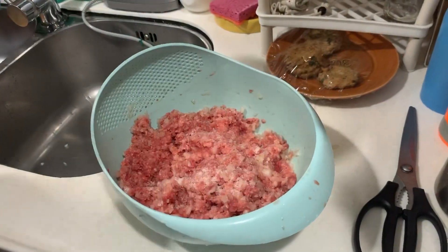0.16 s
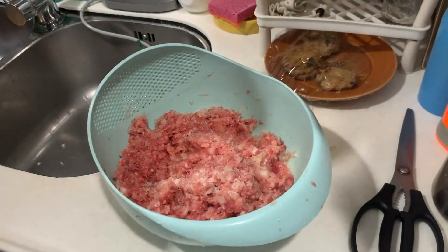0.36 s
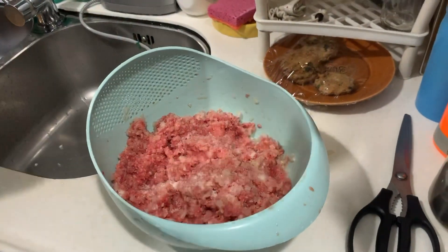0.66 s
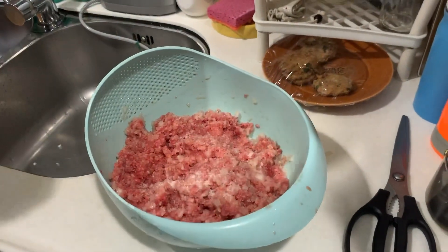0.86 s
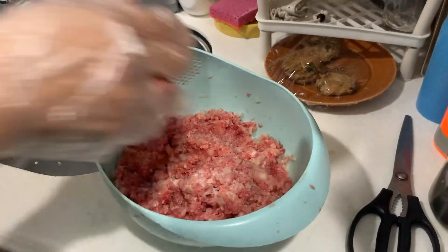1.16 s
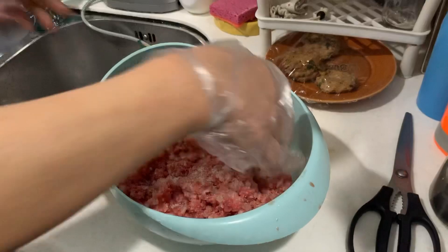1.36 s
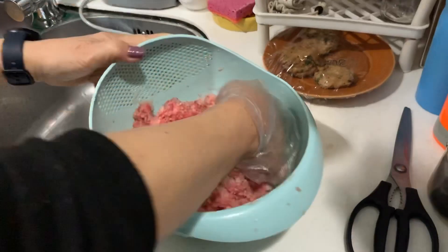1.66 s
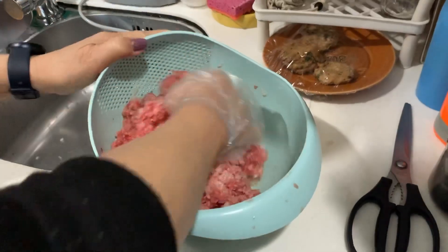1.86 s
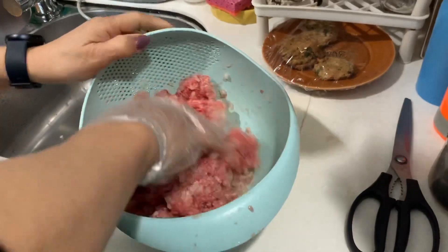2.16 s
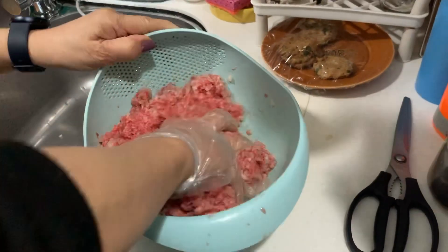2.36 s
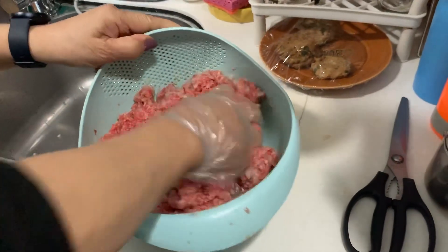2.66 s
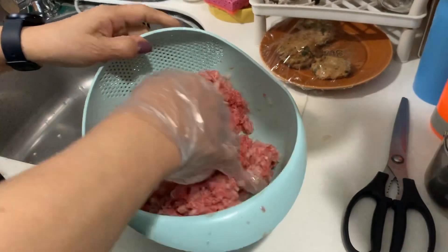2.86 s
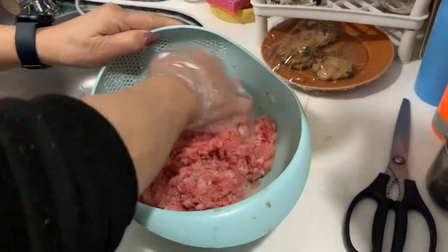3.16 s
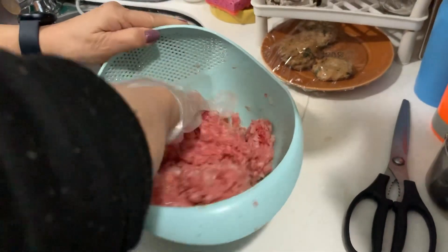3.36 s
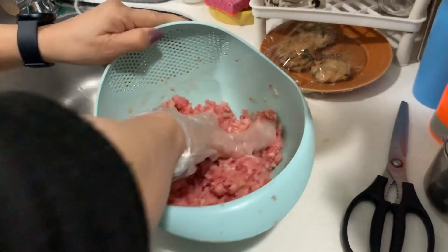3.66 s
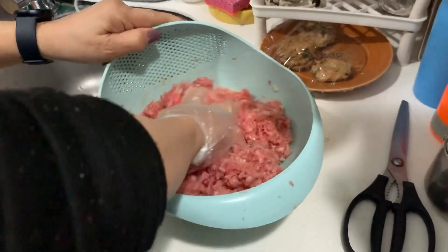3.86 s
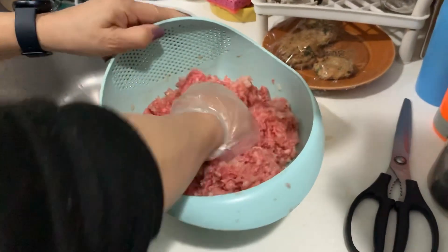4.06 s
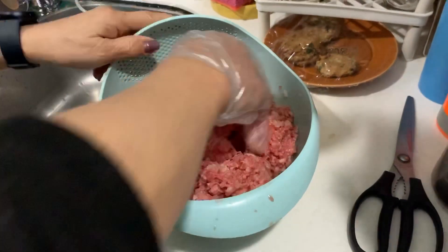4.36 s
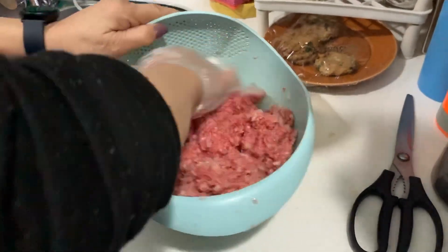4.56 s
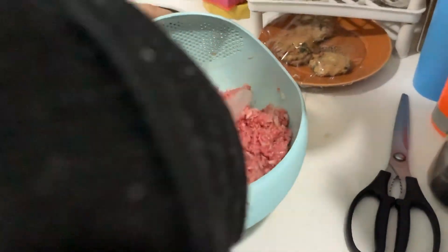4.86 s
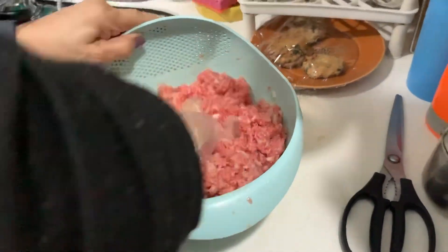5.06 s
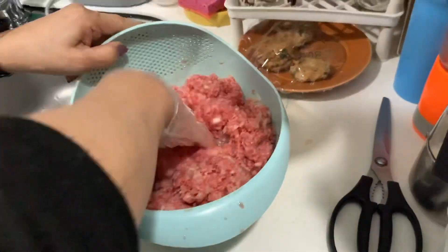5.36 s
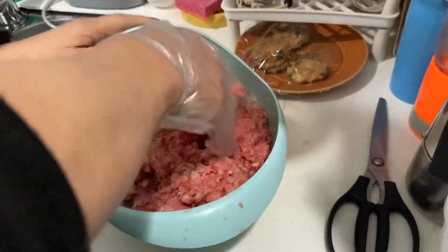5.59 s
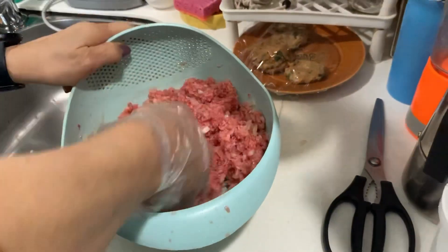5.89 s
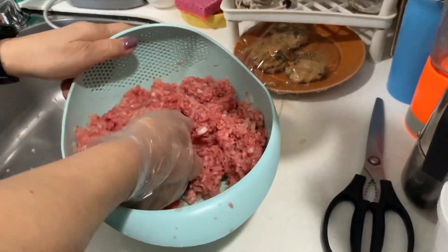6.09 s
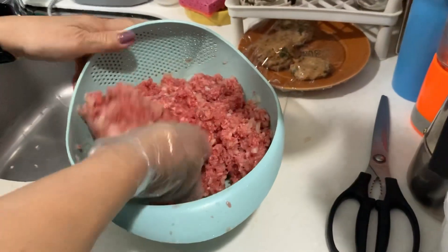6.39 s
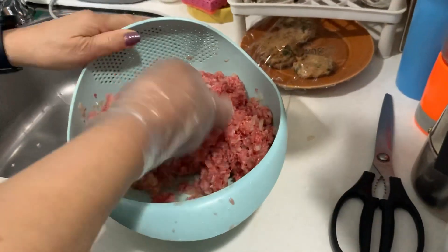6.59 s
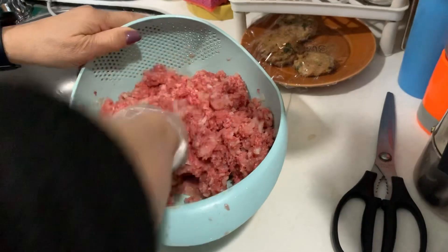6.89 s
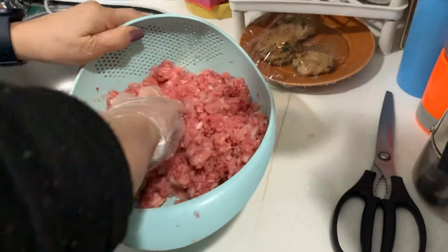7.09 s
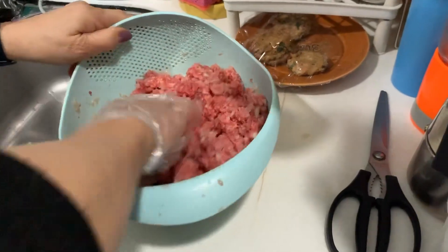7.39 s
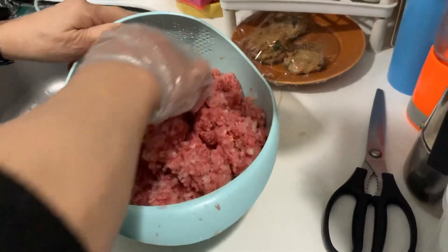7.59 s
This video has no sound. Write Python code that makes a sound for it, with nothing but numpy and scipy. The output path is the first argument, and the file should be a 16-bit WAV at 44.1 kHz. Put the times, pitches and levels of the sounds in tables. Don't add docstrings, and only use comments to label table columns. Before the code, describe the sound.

Close up in a small kitchen, a few hollow, rattling knocks come first over a steady low fridge hum. Thin plastic film begins to crackle as a gloved hand moves in, then it sinks into raw mince. Repeated kneading strokes bring bright crumpling, sticky squelches and little wet pops, while the plastic bowl rubs and bumps lightly on the counter. A phone nearby catches it all in stereo.

```python
import sys
import numpy as np
from scipy import signal
from scipy.fft import rfft, irfft, next_fast_len
from scipy.io import wavfile
from scipy.ndimage import uniform_filter1d, map_coordinates

SR = 44100
rng = np.random.default_rng(int(sys.argv[2]) if len(sys.argv) > 2 else 0)


def transcribe(signal):
    frames = np.atleast_2d(signal).T
    limited = np.clip(frames, -1, 1)
    pcm = np.round(limited * 32767).astype(np.int16)
    wavfile.write(sys.argv[1], SR, pcm)


def linear_from_db(decibels):
    return 10 ** (np.asarray(decibels, float) / 20)


N = 341334
REACH_S, TOUCH_S = 0.87, 1.33
FRAME = 2048

# frequency in Hz, level in dB.
FILM_COLOUR = [(1500, -16), (3000, -11.5), (5200, -9.5), (7000, -4.5), (8500, 0.5), (12000, -1),
               (15500, -1.5), (17000, -3)]
# peak in seconds, build in seconds per 10 dB,
# ease in seconds per 10 dB, film level in dB, mince level in dB.
SQUEEZES = [(1.369, 0.0169, 0.3, -37, -39), (1.538, 0.01, 0.14, -40.5, -44.5),
            (2.1, 0.035, 0.14, -35.5, -43), (2.28, 0.145, 0.29, -34, -40.5), (2.482, 0.22, 0.1, -40.5, -37),
            (2.649, 0.08, 0.13, -33.5, -40.5), (2.97, 0.0955, .25, -35, -38),
            (3.09, 0.06, 0.14, -43, -45.5), (3.25, -1, 1, -47.5, -51.5), (3.76, 0.24, .2, -34.5, -42),
            (3.911, 0.22, 0.07, -38, -38.5), (4.079, 0.07, 0.14, -32, -37.5), (4.47, 0.16, 0.2, -38, -42),
            (4.94, 0.2, 0.3, -38.5, -40), (5.07, 0.2, .08, -38, -40), (5.28, 0.1, .04, -32.5, -35),
            (5.601, 0.12, 0.24, -38.5, -43), (5.87, 0.11, 0.04, -38.5, -45.5),
            (6.21, 0.13, 0.07, -39, -46.5), (6.78, 0.13, 0.02, -35, -51), (6.998, 0.13, 0.14, -35, -41),
            (7.342, 0.14, .22, -36, -44), (7.7, 0.2, 2, -39, -45.5), (5.38, 0.4, 0.17, -41, -50)]


def unit(x):
    return x / np.sqrt(np.mean(x ** 2) + 1e-20)


def along(points, hz):
    f, v = np.transpose(points)
    return np.interp(np.log(hz + 1), np.log(f + 1), v)


def wobble(rate):
    knots = rng.standard_normal(int(N * rate / SR) + 4)
    return map_coordinates(knots, [np.arange(N) * rate / SR])


def filtered(x, response):
    m = next_fast_len(N + SR // 2)
    return irfft(rfft(x, m) * response(np.fft.rfftfreq(m, 1 / SR)), m)[..., :N]


def coloured(x, spectrum):
    return unit(filtered(x, lambda hz: linear_from_db(along(spectrum, hz))))


def resonant(x, modes):
    def response(f):
        total = 0
        for k, (centre, width, db) in enumerate(modes):
            damping = 1j * f * width
            total = total + (-1) ** k * linear_from_db(db) * damping / (centre * centre - f * f + damping)
        return total
    return unit(filtered(x, response))


def hiss(patchy_db=0, span=3):
    z = signal.stft(rng.standard_normal((2, N)), nperseg=256)[2]
    patches = uniform_filter1d(rng.standard_normal(z.shape[1:]), size=6, axis=0)
    patches = uniform_filter1d(patches, size=span, axis=1)
    return signal.istft(z * linear_from_db(patchy_db * unit(patches)), nperseg=256)[1][:, :N]


def crackle(share, spread_db, life, clump_db):
    sizes = linear_from_db(spread_db * np.minimum(rng.exponential(size=N), 4))
    starts = (rng.random(N) < share) * sizes
    grains = signal.lfilter([1], [1, -np.exp(-1 / (life * SR))], starts)
    return unit((2.9 + unit(grains)) * linear_from_db(clump_db * (wobble(14) + wobble(45))))


def bursts(times, peaks_db, t60s, rise):
    out, t = np.zeros(N + SR), np.arange(SR // 3) / SR
    for s, db, t60 in zip(times, peaks_db, np.broadcast_to(t60s, len(times))):
        out[round(s * SR):][:len(t)] += linear_from_db(db - 60 * t / t60) * (1 - np.exp(-t / rise))
    return out[:N]


def blips(rows, t60, ratios, rise=0.0004):
    out, t = np.zeros((2, N + SR)), np.arange(SR // 12) / SR
    phases = rng.random((len(rows), len(ratios), 2, 1))
    for (s, db, hz), phase in zip(rows, phases):
        rings = sum(np.sin(2 * np.pi * (r * hz * (t + 3 * t * t) + p)) for r, p in zip(ratios, phase))
        shape = linear_from_db(db - 60 * t / t60) * (1 - np.exp(-t / rise))
        out[:, round(s * SR):][:, :len(t)] += shape * rings
    return out[:, :N]


def strokes():
    # peak in seconds, build in seconds per 10 dB,
    # ease in seconds per 10 dB, film level in dB.
    film_shifts = [(.96, -0.04, -0.3, -51.5), (1.11, 0.08, 0.06, -42), (1.68, 0.06, 0.5, -44.5),
                   (1.34, .004, .08, -41), (1.93, 0.27, -0.2, -44), (2.075, 0, .08, -41),
                   (3.525, -0.03, .04, -39.5), (3.94, 0.01, .03, -38), (5.0, .05, .1, -40),
                   (3.55, 0, 0.3, -40.5), (4.63, -0.12, 0, -39.5), (4.78, -0.2, 0, -48),
                   (5.75, 0.2, 0, -45), (6.02, 0.2, 0.14, -43.5), (6.099, 0, 0.05, -38.5),
                   (6.46, .11, 0.15, -43), (6.5895, .003, 0.04, -37), (6.68, 0.5, 0.03, -46.5),
                   (6.86, 0.2, .1, -43.5), (7.18, 0.4, 0, -46)]
    stirs = []
    for row in film_shifts:
        before_touch = row[0] < TOUCH_S
        mince_db = row[-1] - 9 - 10 * before_touch
        stirs.append((*row, mince_db))
    return np.transpose(list(SQUEEZES) + stirs)


def swells(s, build, ease, db, rest_db):
    t = np.arange(0, N + 64, 64) / SR
    late = t - s[:, None]
    slope = np.maximum(late / abs(ease[:, None]), -late / abs(build[:, None]))
    power = linear_from_db(2 * db[:, None] - 20 * slope).sum(axis=0)
    rest = linear_from_db(2 * rest_db) * np.clip((t - REACH_S) / .03, 0, 1)
    return np.interp(np.arange(N) / SR, t, np.sqrt(power + rest))


def glove():
    # start in seconds, peak in dB.
    early_snaps = [(0.008, -40), (0.0242, -40), (0.0717, -41), (0.1062, -49), (0.1351, -48), (0.2523, -48),
                   (0.374, -40), (.4375, -46), (0.472, -39), (0.5933, -23), (0.7083, -34), (0.7277, -19),
                   (0.7637, -29), (.885, -41), (0.8909, -35), (0.9133, -33), (0.9353, -28), (0.962, -28.5),
                   (0.986, -27.5), (0.996, -32), (1.005, -28.5), (1.026, -29), (1.0465, -25.5), (1.06, -33),
                   (1.082, -26), (1.111, -24), (1.1662, -33), (1.181, -27), (1.206, -27.5), (1.2341, -37),
                   (1.2955, -33)]
    # start in seconds, peak in dB.
    knead_snaps = [(1.4012, -29.7), (1.4741, -32.8), (1.6226, -34.4), (1.794, -28), (1.8878, -37),
                   (1.9351, -35.3), (1.9697, -33), (2.1009, -26), (2.2029, -29.9), (2.3097, -27.2),
                   (2.381, -32), (2.4529, -29), (2.6154, -28), (2.6566, -27.4), (2.6784, -29),
                   (2.7307, -29.9), (2.8117, -33), (2.9879, -30.7), (3.0061, -28.3), (3.0315, -28.7),
                   (3.1831, -36), (3.5787, -32), (3.6155, -31.0), (3.6424, -31.2), (3.7136, -27.4),
                   (3.771, -30), (3.8307, -29.2), (3.8963, -28.8), (3.9189, -30.1), (3.9397, -29),
                   (3.9589, -31.1), (4.0766, -28), (4.116, -32), (4.3574, -32), (4.4689, -31.5),
                   (4.9032, -29.5), (4.9815, -34), (5.0014, -31), (5.0322, -29.6), (5.0947, -30.9),
                   (5.1369, -33), (5.2205, -28.1), (5.2499, -26), (5.2876, -27.4), (5.7688, -36),
                   (5.8749, -32.2), (5.9245, -33), (6.0132, -33.4), (6.0586, -33), (6.0936, -27.9),
                   (6.1446, -33), (6.2089, -32), (6.23, -31.1), (6.5936, -23.5), (6.6317, -31.5),
                   (6.7738, -31.5), (6.8652, -31), (7.0092, -30), (7.3386, -31), (7.6183, -36.5)]
    s, build, ease, film_db, _ = strokes()
    crumple = swells(s, build, ease, film_db, rest_db=-56)
    creases = crackle(share=.02, spread_db=-0.5, life=0.0005, clump_db=0.65)
    rustle = linear_from_db(6) * crumple * coloured(creases * hiss(patchy_db=1.5), FILM_COLOUR)
    s, db = np.transpose(list(early_snaps) + list(knead_snaps))
    idle = s < TOUCH_S
    pops = bursts(s, db + np.where(idle, -3, 1.5), np.where(idle, 0.023, .029), rise=0.00055)
    return rustle + pops * coloured(hiss(patchy_db=-1.0), FILM_COLOUR)


def meat():
    # frequency in Hz, level in dB.
    flesh_colour = [(300, -41), (800, -7.5), (1200, -2), (2000, -3), (3300, -2), (4500, -3), (6500, -7.5),
                    (10000, -12.5)]
    # start in seconds, peak in dB, pitch in Hz.
    air_pockets = [(1.3636, -34.8, 1652), (1.3792, -32.1, 3816), (1.4074, -30, 4075), (1.4564, -40, 3165),
                   (1.48, -37.7, 3962), (1.5074, -35, 2933), (1.5717, -40, 4021), (1.8075, -40.5, 3596),
                   (2.106, -36, 3500), (2.1504, -37.3, 2013), (2.2738, -37.3, 3200), (2.292, -35.4, 3655),
                   (2.4029, -37.2, 3633), (2.4661, -32, 1862), (2.4828, -29, 1717), (2.6244, -36, 1243),
                   (2.6456, -37.8, 1108), (2.8004, -42, 985), (2.9544, -28, 3386), (2.9743, -33, 2870),
                   (3.0335, -38, 4419), (3.0937, -32, 2347), (3.1104, -34, 2400), (3.1262, -34, 2406),
                   (3.1448, -36.4, 2088), (3.2487, -37, 1932), (3.3442, -44.5, 1841), (3.5665, -41, 3558),
                   (3.6424, -38.6, 3849), (3.6922, -37.8, 1110), (3.7279, -36, 4075), (3.7738, -38, 3020),
                   (3.8184, -35, 4500), (3.8878, -33, 1690), (3.9223, -32, 1464), (4.0803, -37, 1108),
                   (4.3843, -36, 2800), (4.4776, -36, 3230), (4.4944, -29.2, 3246), (4.6969, -42, 3170),
                   (4.8853, -40, 1254), (4.9555, -35.5, 3030), (4.9818, -33, 2395), (5.0048, -35.6, 2298),
                   (5.0423, -37, 3133), (5.1346, -41, 1291), (5.2483, -35.8, 1324), (5.283, -36, 1410),
                   (5.3018, -35.4, 3208), (5.3776, -40.9, 3305), (5.5678, -41, 3770), (5.6197, -38, 3773),
                   (5.6708, -38.5, 3752), (5.8584, -42, 3687), (5.91, -42, 1033), (6.2191, -41.8, 3466),
                   (6.709, -40.5, 2885), (6.9963, -38, 2368), (7.3375, -38, 2690), (7.6736, -32, 2010)]
    # start in seconds, end in seconds, pitch in Hz, level in dB.
    finger_drags = [
        (3.24, 3.4, 2070, -48),
        (2.79, 2.81, 930, -53),
        (1.42, 1.8, 3970, -46),
        (3.88, 4.12, 1150, -45.5),
        (5.05, 5.15, 910, -45),
        (1.335, 1.5, 3800, -42.5),
        (1.335, 1.45, 5000, -48),
    ]
    s, build, ease, _, mince_db = strokes()
    sharp = 0.78
    squeeze = swells(s, sharp * build, sharp * ease, mince_db, rest_db=-58)
    grains = crackle(share=.004, spread_db=2.5, life=0.0059, clump_db=0.27)
    squelch = squeeze * coloured(grains * hiss(patchy_db=2.0, span=9), flesh_colour)
    pops = blips(air_pockets, t60=0.021, ratios=[.85, 1.001, 1.2])
    t = np.arange(N) / SR
    drag = 0
    for start, end, hz, db in finger_drags:
        gain_db = np.interp(t, [start, start + 0.012, end, end + 0.022], [db, db, db - 9, -120], left=-120)
        drag = drag + linear_from_db(gain_db) * resonant(hiss(), [(hz, hz / 5, 0)])
    return linear_from_db(1.5) * squelch + linear_from_db(-1.5) * pops + drag


def bowl():
    # frequency in Hz, width in Hz, level in dB.
    bowl_modes = [(223, 85, -2), (309.5, 58, 1), (450, 98, -0.5), (582, 144, -4), (777, 120, -5)]
    # start in seconds, peak in dB, fall by 60 dB in seconds.
    bowl_bumps = [(1.63, -50, 0.1), (1.82, -43.5, 0.12), (2.15, -44, 0.089), (2.28, -45, 0.13),
                  (3.092, -31, 0.082), (3.102, -32, 0.11), (3.115, -34.5, 0.08), (3.129, -37, .06),
                  (3.248, -42, 0.1), (3.78, -42, .1), (3.864, -37.5, 0.11), (4.38, -44.5, 0.071),
                  (4.494, -31.5, 0.051), (4.89, -43.5, 0.086), (4.973, -35, 0.1), (5.279, -44, 0.086),
                  (5.04, -42, 0.17), (5.909, -34, 0.065), (6.795, -41, 0.18), (6.946, -36, 0.11)]
    # start in seconds, peak in dB, pitch in Hz.
    counter_thumps = [
        (1.488, -31, 86),
        (3.25, -44.5, 79.4),
        (4.11, -35, 73),
    ]
    # start in seconds, peak in dB, pitch in Hz.
    foot_taps = [(1.6273, -44, 260), (1.8238, -42, 280), (2.3435, -43, 300), (3.0945, -28.5, 301),
                 (3.106, -31, 310), (3.119, -34, 330), (3.131, -37, 520), (3.2513, -42, 260),
                 (3.8658, -38, 322), (3.9146, -39, 322), (4.3856, -41, 330), (4.4187, -45, 320),
                 (4.4945, -32, 306), (4.495, -38, 560), (4.8942, -41, 280), (4.9544, -42, 300),
                 (4.9757, -34, 511), (5.2913, -38, 296), (5.912, -37, 400), (6.8245, -42, 300),
                 (6.9521, -39, 300)]
    s, build, ease, _, mince_db = np.transpose(SQUEEZES)
    sharp = 0.48
    load = swells(s, sharp * build, sharp * ease, mince_db - 13, rest_db=-58.5)
    s, db, t60 = np.transpose(bowl_bumps)
    drive = load * linear_from_db(2.6 * wobble(25)) + bursts(s, db - 6, t60, rise=0.0019)
    thumps, t = np.zeros(N + SR), np.arange(SR // 3) / SR
    for s, db, hz in counter_thumps:
        shape = linear_from_db(db - 60 * t / .3) * (1 - np.exp(-t / 0.014))
        thumps[round(s * SR):][:len(t)] += shape * np.sin(2 * np.pi * hz * t)
    taps = linear_from_db(3) * blips(foot_taps, t60=0.043, ratios=[1.001], rise=0.0015)
    return drive * resonant(hiss(), bowl_modes) + thumps[:N] * [[1], [0]] + taps


def knocks():
    # start in seconds, peak in dB, body in dB and bright edge in dB against the peak.
    blows = [
        (0.37, -26.5, 3.5, -33),
        (0.384, -29.5, -21, -13),
        (0.57, -19, -10, -38),
        (0.589, -30.5, 8.5, -26),
        (0.687, -35, -4, -21),
        (0.709, -21, -8, -23),
        (0.725, -21, -8, -8),
        (0.761, -26.5, -2, -15),
        (0.798, -35.5, 1.5, -16),
        (0.839, -52, 10.5, -17),
    ]
    # start in seconds, peak in dB, pitch in Hz.
    hard_contacts = [(0.3703, -33.5, 2200), (0.382, -30, 1394), (0.3904, -33.7, 1390), (0.3973, -35, 1380),
                     (0.4063, -36, 1480), (0.4234, -42, 1437), (0.5755, -25.5, 1410), (0.5924, -29, 1220),
                     (0.5975, -32, 1090), (0.6202, -44, 1464), (0.6345, -45.6, 1146), (0.7148, -27, 2160),
                     (0.7209, -32.0, 1588), (0.7312, -29.9, 1390), (0.7368, -32, 2255),
                     (0.7461, -32.0, 995), (0.7516, -33.3, 1394), (0.768, -36, 1399), (0.7825, -36, 974),
                     (0.7922, -37.9, 1022), (0.7984, -39.2, 958), (0.8083, -43.2, 1125),
                     (0.8162, -43.7, 1168), (0.83, -41.2, 1195)]
    # start in seconds, peak
    # in dB, pitch in Hz.
    first_touches = [(.3705, -29, 2200), (.376, -33, 2000), (.5705, -23, 1150), (.571, -28, 2840),
                     (.572, -30, 2000), (.687, -41, 2250), (.7095, -28, 2160), (.71, -32, 3200),
                     (4.4935, -30, 2150), (4.9757, -36, 2130), (5.9095, -41, 1300), (7.675, -34, 3000),
                     (2.4825, -34, 3100)]
    # start in seconds, peak in dB, pitch in Hz.
    low_contacts = [(.374, -34, 330), (0.382, -23.6, 387), (0.403, -33.4, 396), (0.417, -38, 330),
                    (0.5775, -26.5, 298), (.588, -27, 270), (0.5965, -20.7, 340), (0.6055, -26, 420),
                    (0.614, -30.3, 456), (0.633, -35, 274), (0.7145, -32, 230), (0.7255, -25, 320),
                    (.734, -29, 280), (0.747, -31, 349), (0.7605, -24.4, 420), (0.7745, -32, 322),
                    (0.786, -36, 382), (0.798, -29.6, 500), (.826, -38, 420), (0.835, -34.4, 390)]
    # frequency in Hz, level in dB.
    clack_colour = [(400, -33), (650, -25), (900, -2), (1400, -1.5), (1800, -4.5), (2700, -6), (4000, -9.5),
                    (7500, -14.5), (12000, -22), (16500, -39)]
    # frequency in Hz, width in Hz, level in dB.
    board_modes = [(207, 54, -6.5), (293, 48, 0), (348, 65, 0), (431, 46, -1), (544, 87, -5.5),
                   (828, 33, -3.5)]
    s, db, body_db, bright_db = np.transpose(blows)
    t60 = 0.098
    rattle = linear_from_db(0.54 * wobble(151.0))
    clack = bursts(s, db - 10.5, t60, rise=0.0013)
    tail = bursts(s, db - 17.0, 2.4 * t60, rise=0.0078)
    ring = linear_from_db(-3.5) * blips(hard_contacts, t60=0.055, ratios=[1.001, 1.07], rise=0.00073)
    touch = linear_from_db(-1.5) * blips(first_touches, t60=.04, ratios=[1.001], rise=.0003)
    thuds = linear_from_db(1.5) * blips(low_contacts, t60=0.046, ratios=[1.001], rise=0.0014)
    body = bursts(s, db + body_db - 3.5, 1.56 * t60, rise=0.0061) * resonant(hiss(), board_modes)
    edge = bursts(s, db + bright_db, 0.7 * t60, rise=0.00076) * coloured(hiss(), FILM_COLOUR)
    clatter = (clack + tail) * coloured(hiss(patchy_db=1.0), clack_colour)
    return rattle * (ring + touch + clatter + edge) + body + thuds


def kitchen():
    # frequency in Hz, level in dB.
    motor_lines = [(49, -60), (305.5, -63.5), (344, -65), (447, -66)]
    # frequency in Hz, level in dB.
    rumble_colour = [(25, -18), (38, -2), (49, 0), (60, 3.5), (78, -4), (95, 11), (107, 9.5), (130, 0.5),
                     (170, -27.5)]
    # frequency in Hz, level in dB.
    room_colour = [(90, -33), (135, 4), (170, -6.5), (240, -5), (308, -3), (366, -8.5), (450, -3.5),
                   (560, -10), (800, -13), (1400, -17.5), (3000, -18.5), (6000, -29), (10000, -48),
                   (16000, -52)]
    t = np.arange(N) / SR
    hum_gain = np.sqrt(2) * linear_from_db(-40) * linear_from_db(.5 * wobble(9) + .5 * wobble(2.5))
    tones = hum_gain * np.sin(2 * np.pi * 114.75 * t + .06 * wobble(6))
    for hz, db in motor_lines:
        tones = tones + linear_from_db(db + 4.34 * wobble(11)) * np.sin(2 * np.pi * hz * t + 1.28 * wobble(4))
    rumble = linear_from_db(-51.5 + 0.43 * wobble(2.8)) * coloured(hiss(), rumble_colour)
    air = linear_from_db(-55.5 + 0.46 * wobble(2.9)) * coloured(hiss(), room_colour)
    return tones * [[1], [0]] + rumble + air


def scene():
    return glove() + meat() + bowl() + knocks() + kitchen()


def thrifty(pair):
    # frequency in Hz, level in dB.
    least_detail = [(300, -33), (1000, -23), (2000, -14), (3000, -12), (5000, -11), (7000, -11.5),
                    (16000, -10)]
    half, offset = FRAME // 2, 106
    n, k = np.arange(FRAME)[:, None], np.arange(half)
    window = np.sin(np.pi * (n + .5) / FRAME)
    basis = window * np.cos(np.pi / half * (n + .5 + half / 2) * (k + .5)) * np.sqrt(2 / half)
    padded = np.pad(pair, ((0, 0), (half + offset, FRAME - (N + offset) % half)))
    blocks = padded.reshape(2, -1, half)
    z = np.concatenate([blocks[:, :-1], blocks[:, 1:]], axis=2) @ basis
    hz = (k + .5) * SR / FRAME
    treble = np.sqrt(np.mean(z[..., (hz > 6000) & (hz < 15800)] ** 2, axis=(0, 2)))[:, None]
    budget = unit(uniform_filter1d(rng.standard_normal((*z.shape[:2], half // 8)), size=5, axis=1))
    limit_db = along(least_detail, hz) + 3.5 * np.repeat(budget, 8, axis=2)
    least = np.hypot(treble, linear_from_db(-74)) * linear_from_db(limit_db)
    power = np.repeat((z ** 2).reshape(2, -1, half // 16, 16).mean(axis=3), 16, axis=2)
    margin_db = -8 + 2 * (hz > 10000) + 4 * (treble < linear_from_db(-58))
    beside_other = power > power[::-1] * linear_from_db(2 * margin_db)
    strong = power > least ** 2 * linear_from_db(2 * 1.5)
    kept = beside_other & strong | (hz < 2300)
    frames = (z * kept * (abs(z) > least)) @ basis.T
    joined = frames[:, 1:, :half] + frames[:, :-1, half:]
    return joined.reshape(2, -1)[:, offset:offset + N]


def top_cut(x):
    return signal.sosfilt(signal.butter(12, 17100, fs=SR, output="sos"), x)


def record(dry):
    # frequency in Hz, likeness from 0 to 1.
    likeness = [(150, 0.96), (210, 0.96), (300, 0.75), (500, 0.4), (700, 0.35), (860, 0.69), (1100, 0.28),
                (3300, 0.28), (5000, 0.29), (5900, 0.24), (7000, 0.99), (7900, 0.96)]
    # frequency in Hz, left minus right in dB.
    left_lean = [(150, 0), (330, -2), (520, -1), (840, 1.5), (1360, 4), (2200, 2), (2800, 3), (3600, -.5),
                 (4600, -2.5), (5700, -2), (7000, 0)]
    # frequency in Hz, lead of the left in radians.
    left_lead = [(340, 0), (600, .5), (860, 2.9), (1120, 1.1), (2000, 1.8), (2450, 2.9), (3300, .8),
                 (4200, 2.4), (5250, 3), (6300, 5.9), (7200, 4.9), (8600, 3.14)]
    hz, t, (shared, differing) = signal.stft(dry, SR, window="cosine", nperseg=FRAME)
    turn = np.arccos(np.clip(along(likeness, hz), 0, 1))[:, None] / 2
    lead = along(left_lead, hz) - 2 * np.pi * np.maximum(hz - 8600, 0) / 4700
    band = np.arange(len(hz)) // 24
    flutter = uniform_filter1d(rng.standard_normal((band[-1] + 1, len(t))), size=3, axis=1)[band]
    phase = lead[:, None] + .35 * flutter * (hz > 500)[:, None]
    half = np.exp(.5j * phase) * linear_from_db(along(left_lean, hz) / 2)[:, None]
    left = (shared * np.cos(turn) + differing * np.sin(turn)) * half
    right = (shared * np.cos(turn) - differing * np.sin(turn)) / half
    pair = np.array([left + right, left - right]) / 2 * (hz < 15800)[:, None]
    mid, side = thrifty(signal.istft(pair, SR, window="cosine", nperseg=FRAME)[1][:, :N])
    return top_cut(np.array([mid + side, mid - side]))


dry = scene()
out = record(dry)
transcribe(out)
```